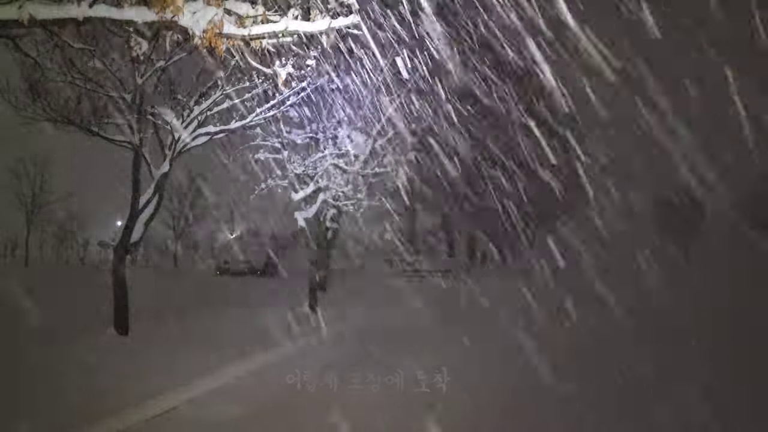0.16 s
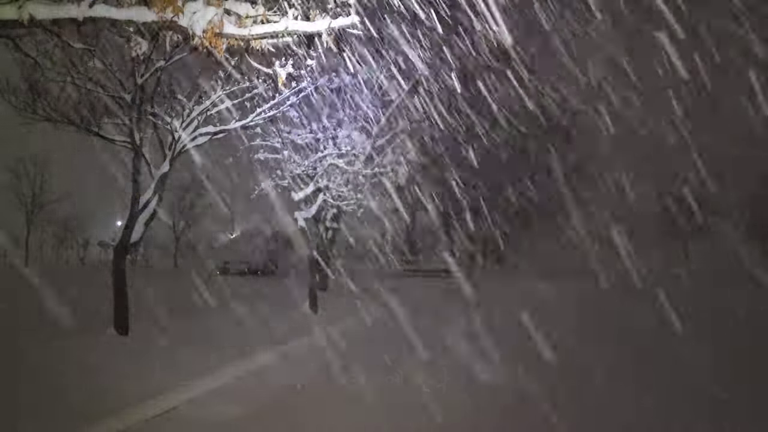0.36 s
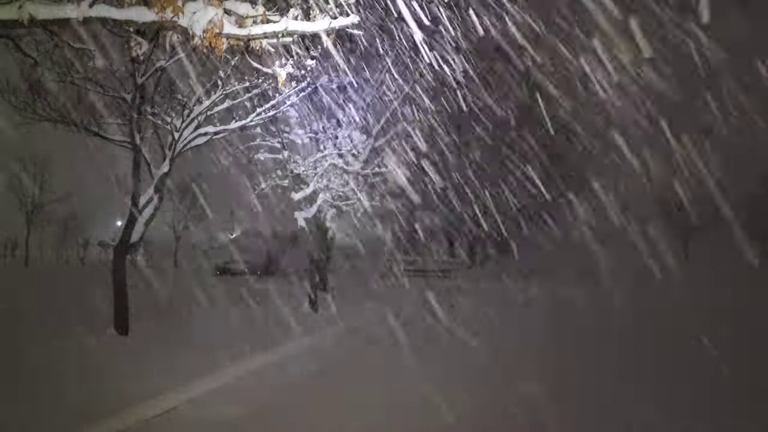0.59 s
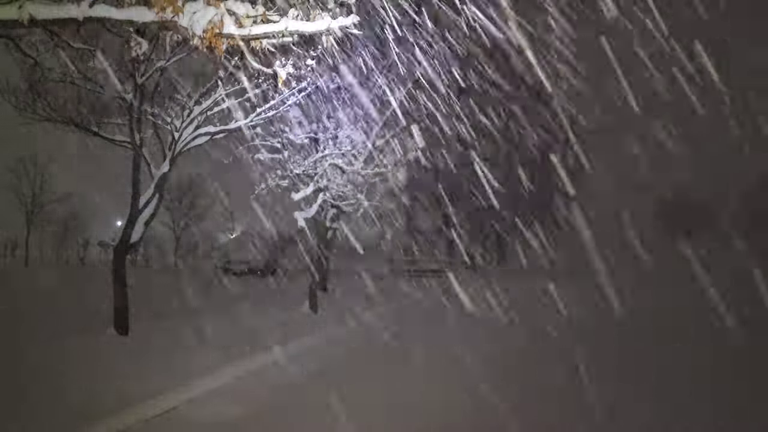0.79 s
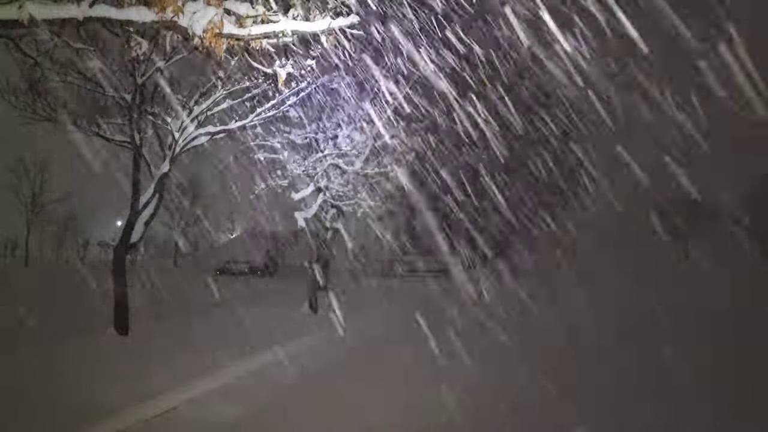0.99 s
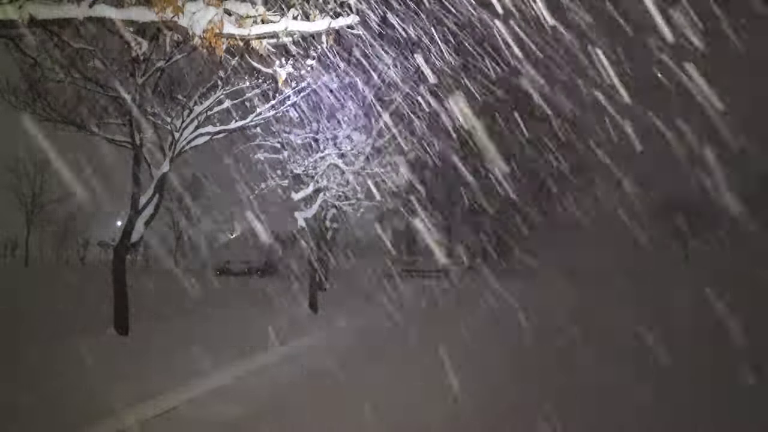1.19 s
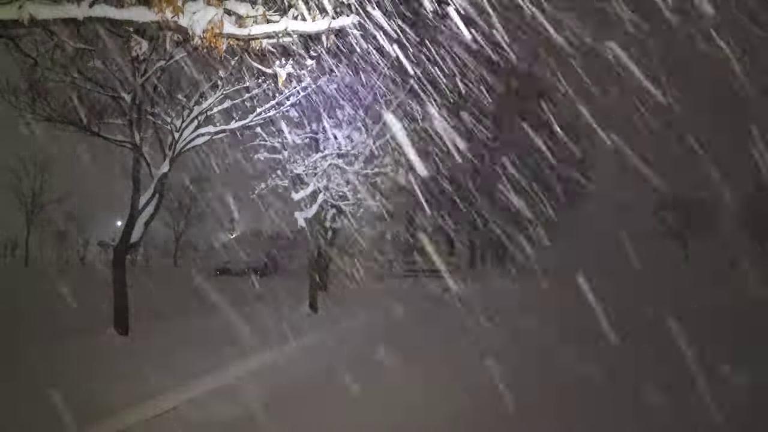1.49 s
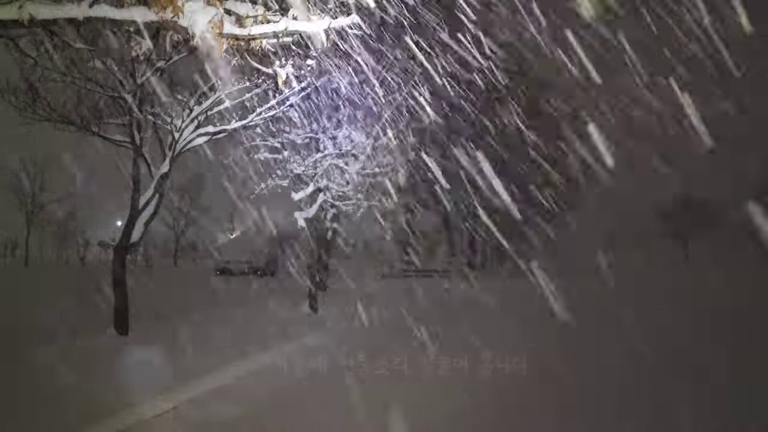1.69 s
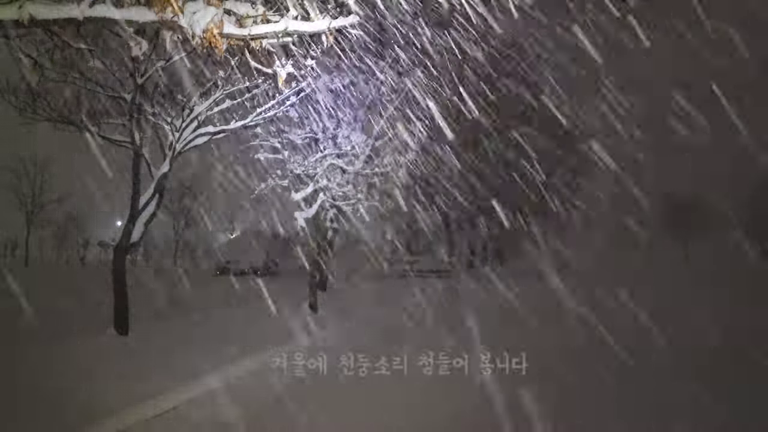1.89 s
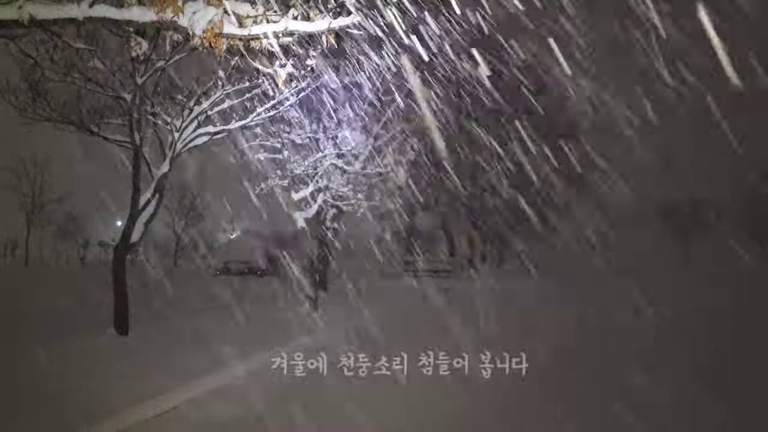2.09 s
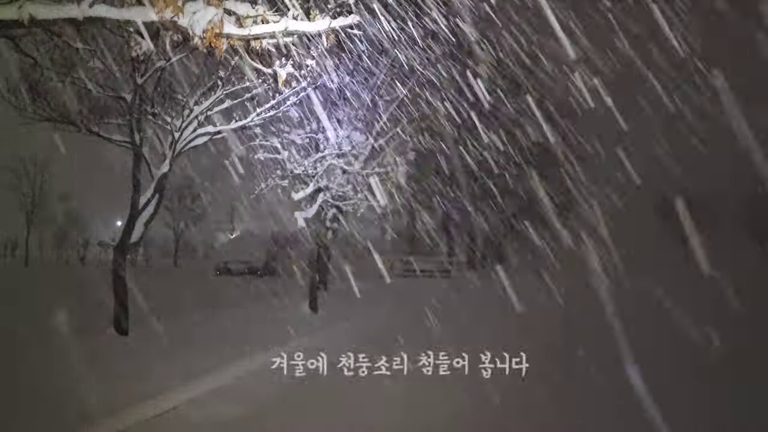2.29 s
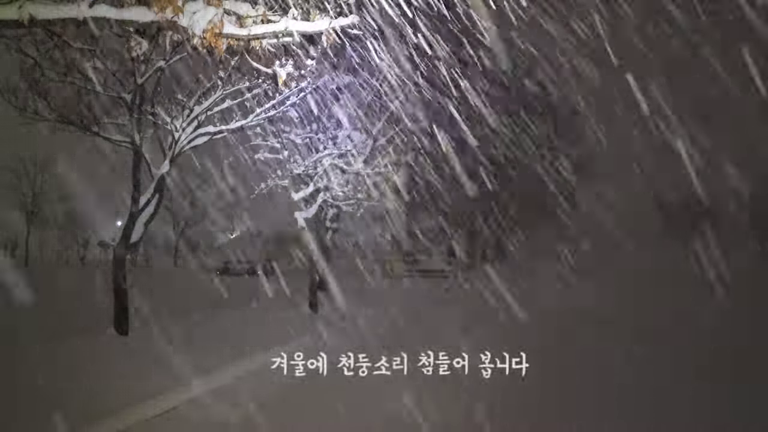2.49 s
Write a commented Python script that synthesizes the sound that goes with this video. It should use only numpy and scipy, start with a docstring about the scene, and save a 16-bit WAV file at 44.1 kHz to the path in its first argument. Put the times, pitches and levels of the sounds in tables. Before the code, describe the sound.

After a brief quiet low hum in a snowy park at night, thunder cracks, thumps in clustered peals and rolls away, with a weaker late rumble; tiny snow grains patter near the microphone, slightly left.

```python
"""Thunder breaks over a park in a night snowstorm and rolls away.
Shock waves from the crooked lightning channel arrive in peals: dense streams of clicks with echoes, coloured
as a deep roll, a hollow ring and a tearing crackle, lose varying treble to the air; single booms are fading sines.
Icy snow ticks close to the microphone as short noise bursts and ringing scratches.
Under it lie a low steady rumble and hum, faint thin tones and a hiss, all shaped from noise."""
import sys
import numpy as np
from scipy import signal
from scipy.fft import rfft, irfft
from scipy.io import wavfile
from scipy.ndimage import uniform_filter1d, map_coordinates

SR = 44100
rng = np.random.default_rng(int(sys.argv[2]) if len(sys.argv) > 2 else 0)


def to_wav(sig):
    """Store sig (one row per channel, or 1-D mono) as 16-bit WAV at the path in sys.argv[1].

    Samples outside -1..1 are clipped; the rate is SR.
    """
    pcm = np.clip(np.atleast_2d(sig), -1, 1) * 32767
    pcm = np.round(pcm).astype(np.int16)
    wavfile.write(sys.argv[1], SR, pcm.T)  # frames by channels


N = 116865
T = np.arange(N) / SR  # time in seconds


# Colour of the deep roll at first, then later on: [pitch_hz, relative level_db per Hz]
DEEP_EARLY = [(20, -18.5), (45, -25), (80, -15), (125, 1), (180, -4.5), (215, -9.5), (250, -6), (305, -18),
              (420, -16), (800, -60), (2000, -92)]
DEEP_LATE = [(20, -21), (45, -12), (85, -10.5), (125, 2), (160, -4), (210, -1), (250, 1.5), (310, -12),
             (420, -16), (800, -53), (2000, -97.5)]
LATE_FROM_S, LATE_FADE_S = 0.843, 0.3
LATE_SPREAD_DB = 3  # the later shocks are less even in size


def deep_roll():
    """Low-coloured shocks cross over, at equal power, to a later colour."""
    late = np.clip((T - LATE_FROM_S) / LATE_FADE_S, 0, 1)
    early_roll = np.sqrt(1 - late) * shocks(DEEP_EARLY)
    late_roll = np.sqrt(late) * shocks(DEEP_LATE, LATE_SPREAD_DB)
    return early_roll + late_roll


# Colour of the hollow ring before its pitch drifts: [pitch_hz, relative level_db per Hz]
HOLLOW = [(150, -42), (300, -29.5), (365, -7), (408, -1), (450, -6), (540, -16), (700, -31), (1500, -51.5),
          (3000, -88)]
# Pitch of the hollow ring along the way: [time_s, pitch_hz]
RING_PITCH = [(.2, 435.4), (.42, 425), (.53, 405), (.72, 420.3), (1.2, 405.5), (2.6, 393.3)]
RING_HZ = 408  # peak of the HOLLOW colour


def hollow_ring():
    """Shocks in a hollow resonance, read at a varying speed so that its pitch drifts."""
    speed = np.interp(T, *np.transpose(RING_PITCH)) / RING_HZ
    place = np.cumsum(speed)
    return map_coordinates(shocks(HOLLOW), [place], order=3, mode="mirror")


# Colour of the tearing crackle: [pitch_hz, relative level_db per Hz]
CRACKLE = [(100, -17), (300, -19), (480, 1), (640, -0.5), (790, 0.5), (890, -3.5), (990, -2.5), (1130, -5),
           (1420, -6), (1630, -11.5), (2100, -12), (2800, -19), (3600, -27), (5000, -40), (9000, -54.5)]


def tearing_crackle():
    """Shocks coloured towards the middle pitches tear and crackle."""
    return shocks(CRACKLE)


def thunder():
    """Three streams of shocks swell with the peals, alike in both channels, and pass through the air."""
    deep, hollow, crackle = strength()
    peals = deep * deep_roll() + hollow * hollow_ring() + crackle * tearing_crackle()
    return through_air(peals)


# Peals, levels before the air: [start_s, length_s, deep_level_db, hollow_level_db, crackle_level_db]
PEALS = [(0.189, 0.039, -34, -31, -51), (0.205, 0.032, -37, -46, -38), (0.255, 0.077, -28.5, -33, -45),
         (0.414, 0.065, -31.5, -26, -39), (0.498, 0.053, -42, -22, -34), (0.589, 0.029, -24.5, -28.5, -36),
         (0.618, 0.036, -26, -30, -30), (0.673, 0.13, -31, -31, -39.5), (0.924, 0.046, -29.5, -37.5, -42),
         (1.053, 0.029, -27.5, -33.5, -34.5), (1.092, 0.015, -29, -35.5, -42),
         (1.132, 0.013, -30, -27.5, -40.5), (1.162, 0.053, -24.5, -47, -36),
         (1.295, 0.033, -30.5, -34, -38.5), (1.384, 0.04, -26, -34.5, -37.5),
         (1.473, 0.058, -28.5, -37.5, -42), (2.057, 0.026, -28, -37.5, -41.5),
         (2.09, 0.066, -32.5, -40, -42.5), (2.165, 0.105, -34.5, -49.5, -41)]
# Long roll between the peals, levels before the air: [time_s, deep_level_db, crackle_level_db]
ROLL = [(.19, -32.5, -37.5), (.39, -33, -38), (.6, -26, -35), (.88, -32.5, -38), (1.02, -34.5, -38.5),
        (1.25, -30, -37), (1.58, -33.5, -41.5), (1.8, -38, -41), (2.02, -42, -43), (2.3, -37, -43.5),
        (2.44, -39.5, -46), (2.56, -42.5, -44), (2.65, -41, -47)]
ROLL_RING_DB = -1  # hollow ring of the long roll, relative to its crackle
ATTACK_S, RELEASE_S = 0.0069, 0.013


def strength():
    """Gains of deep roll, hollow ring and crackle: the power of the peals adds to that of the long roll."""
    s, deep_db, crackle_db = np.transpose(ROLL)
    deep = amp(np.interp(T, s, deep_db))
    crackle = amp(np.interp(T, s, crackle_db))
    onset = np.clip((T - PEALS[0][0]) / ATTACK_S, 0, 1)
    power = (np.array([deep, crackle * amp(ROLL_RING_DB), crackle]) * onset) ** 2
    for start, length, *levels_db in PEALS:
        rise = np.clip((T - start) / ATTACK_S, 0, 1)
        fall = np.exp(-np.maximum(T - start - length, 0) / RELEASE_S)
        power += (amp(levels_db)[:, None] * rise * fall) ** 2
    return np.sqrt(power)


SHOCKS_PER_S, SHOCK_SPREAD_DB = 9000, 2.4
EVEN_S = .024  # window over which swells are evened out
# echoes from the surroundings: first delay, time to fall 60 dB, summed energy against the direct shock
ECHO_S, ECHO_T60_S, ECHO_DB = .012, 0.65, -8


def shocks(points, spread_db=SHOCK_SPREAD_DB):
    """A steady stream of small shock waves and their echoes off the surroundings, in one colour."""
    t = T[:SR // 2]
    sparse = rng.standard_normal(len(t)) * (rng.random(len(t)) < .01)
    echo = sparse * (t > ECHO_S) * amp(-60 * t / ECHO_T60_S)
    echo *= amp(ECHO_DB) / np.linalg.norm(echo)
    echo[0] = 1  # the direct shock
    echoing = convolve(clicks(SHOCKS_PER_S, spread_db), echo)
    x = convolve(echoing, colour(points))[0]
    local_power = abs(uniform_filter1d(x ** 2, max(int(EVEN_S * SR), 1)))
    # dividing by the root of the local power evens the swells out
    return x / np.sqrt(local_power + 1e-9)


# Treble lost in the air: [time_s, loss_db per kHz above 1 kHz]
AIR_LOSS = [(.19, 1), (.65, 1.4), (1.05, 3.5), (1.6, 4), (2.2, 7.5), (2.55, 3.5)]


def through_air(x):
    """The air takes treble by an amount that changes with the time of arrival."""
    hz, t, z = signal.stft(x, SR, nperseg=256)
    khz_above = np.maximum(hz / 1000 - 1, 0)
    db_per_khz = np.maximum(np.interp(t, *np.transpose(AIR_LOSS)), 0)
    loss_db = np.outer(khz_above, db_per_khz)
    return signal.istft(z * amp(-loss_db), SR, nperseg=256)[1][:N]


# Single strong shocks: [start_s, level_db of the sine, length_s of one swing up and down, shudder_s decay time]
BOOMS = [(.2462, -20.5, 0.0043, .002), (.2812, -19.5, 0.0059, 0.0026), (.595, -12.5, .0062, 0.0038),
         (.622, -13, 0.0084, 0.0025), (.7835, -17.5, 0.0057, 0.0034), (1.0545, -19, 0.0049, 0.016),
         (1.197, -16, 0.0046, 0.0075), (1.3105, -16, 0.0044, .007), (1.366, -18, 0.011, 0.0035),
         (2.1172, -18, 0.006, .001), (2.2295, -19.5, 0.0065, 0.0015), (2.3515, -24.5, 0.0051, .003)]


def booms():
    """Each strong shock is a smooth pressure swing that shudders on at the same pitch as it fades."""
    out, t = np.zeros(N), T[:SR // 10]
    for s, db, length, shudder in BOOMS:
        fade = np.exp(-np.maximum(t - .75 * length, 0) / shudder)
        add(out, s, amp(db) * fade * np.sin(2 * np.pi * t / length))
    return out


# Colour of the snow grains: [pitch_hz, relative level_db per Hz]
GRAIN = [(500, -12), (2500, -5), (4000, 3.5), (5200, -3.5), (6300, 2), (7400, 1), (9000, -0.5), (10500, -8),
         (11600, -3), (15500, -11)]
# Small clumps of snow, level before the grain colour: [start_s, level_db, length_s, left_minus_right_db]
TICKS = [(0.168, -63, .004, 5), (0.243, -58.5, 0.008, 3.5), (0.272, -56.5, 0.004, .5),
         (0.371, -60.5, 0.011, 3), (0.46, -60, .004, 2.5), (0.48, -61, .008, 5),
         (0.728, -58.5, 0.0041, 3.5), (.813, -60, 0.0033, 2.5), (0.833, -61, 0.009, 1),
         (1.235, -62, 0.0043, -1), (1.289, -64, .004, 2.5), (1.349, -62, 0.0046, 4),
         (1.487, -60, 0.0084, 4), (1.627, -61, 0.0046, -8), (1.644, -54, 0.0037, 3),
         (1.724, -60, 0.0073, 2), (1.747, -58, 0.004, 6), (1.81, -58, 0.0059, -1), (1.877, -59, .004, 5),
         (2.083, -63.5, 0.016, 1), (2.332, -60, 0.011, 0), (2.546, -58.5, 0.0039, -3)]
GRAINS_PER_S, GRAIN_SPREAD_DB = 370, 2.5  # in each channel
GRAINS_DB = -72.5  # before the tilt to the left
SNOW_LEFT_DB = 1.24  # left raised and right lowered by this much


def snow():
    """Icy grains patter near the microphone as clicks; clumps crumble in noise bursts as they land."""
    left, right = [clicks(GRAINS_PER_S, GRAIN_SPREAD_DB) * amp(GRAINS_DB + side * SNOW_LEFT_DB)
                   for side in (1, -1)]
    hits = np.array([left, right])
    t = T[:SR // 10]
    for s, db, length, pan_db in TICKS:
        shape = np.sqrt(2 * t / length) * np.exp(.5 - t / length)  # peaks at 1, half a length in
        crumble = rng.standard_normal((2, len(t))) * shape
        add(hits, s, crumble * amp(db) * amp([[pan_db / 2], [-pan_db / 2]]))
    return convolve(hits, colour(GRAIN))


# Pitches over which the single ice grains are spread: [pitch_hz]
PING_PITCHES = [4500, 6800, 7400, 7600, 8600, 9300]
PINGS_PER_S, PING_SPREAD_DB = 100, 2  # in each channel
PING_S, PING_WIDTH_HZ = .0025, 1200  # decay time of the scratch, width of each resonance
PINGS_DB = -71.5  # before the tilt to the left


def pings(count=28):
    """Single ice grains scratch briefly: noise in a double resonance, each in one channel."""
    t, out = T[:SR // 20], np.zeros((2, N))
    size = amp(PING_SPREAD_DB * np.minimum(rng.exponential(1, (2, N)), 3))
    size *= rng.random((2, N)) < PINGS_PER_S / SR
    kind = rng.integers(0, count, (2, N))
    given = np.linspace(0, 1, len(PING_PITCHES))
    pitches = np.interp(np.linspace(0, 1, count), given, PING_PITCHES)
    for k, hz in enumerate(pitches):
        scratch = rng.standard_normal(len(t)) * np.sqrt(t) * np.exp(-t / PING_S)
        pole = np.exp(np.pi * (2j * hz - PING_WIDTH_HZ) / SR)
        ping = signal.lfilter([1], np.poly([pole, pole]), scratch).real
        out += convolve(size * (kind == k), unit(ping))
    return amp(PINGS_DB) * unit(out) * left_tilt()


# Colour of the low rumble: [pitch_hz, relative level_db per Hz]
RUMBLE = [(20, -25), (42, -14.5), (66, 4.5), (90, -3), (130, -7.5), (165, -7.5), (215, -4.5), (260, -22.5),
          (300, -15), (360, -25), (500, -34), (700, -35.5), (870, -41), (1400, -45.5), (2100, -45.5),
          (2700, -49), (6000, -65)]
RUMBLE_DB = -40.5
HUM_HZ, HUM_WIDTH_HZ, HUM_DB = 64.1, 4.9, -43.5


def rumble_and_hum():
    """Low distant rumble of shaped noise with a wavering hum, alike in both channels."""
    return amp(RUMBLE_DB) * noise(RUMBLE) + amp(HUM_DB) * tone(HUM_HZ, HUM_WIDTH_HZ)


# Colour of the faint hiss: [pitch_hz, relative level_db per Hz]
HISS = [(60, 14), (300, 13.5), (420, 14.5), (500, 3.5), (750, 7), (880, -4), (2300, -1), (3100, 4),
        (4000, 4), (5200, -2.5), (7500, -3), (9000, -0.5), (10500, -9.5), (11600, -12.5), (13500, -6.5),
        (15500, -5)]
HISS_DB = -64  # before the tilt to the left


def hiss():
    """Faint shaped noise, separate in each channel."""
    return amp(HISS_DB) * noise(HISS, channels=2)


# Faint tones, level before the tilt: [pitch_hz, width_hz, level_db, left-right likeness from -1 to 1]
RINGING = [(406, 17, -63, 0.96), (576, 14, -66, 0.71), (739, 11, -66.5, -0.25), (1438, 35, -67, -.7),
           (1773, 38, -64, -0.69), (2940, 52, -73, -0.14), (7400, 150, -81, -0.1)]


def ringing():
    """Thin lasting tones, each with its own likeness between the channels."""
    out = np.zeros((2, N))
    for hz, width, db, likeness in RINGING:
        left, other = tone(hz, width, channels=2)
        right = likeness * left + np.sqrt(1 - likeness ** 2) * other
        out += amp(db) * np.array([left, right])
    return out


def background():
    """Rumble and hum in the middle; hiss and thin tones lean to the left."""
    return rumble_and_hum() + (hiss() + ringing()) * left_tilt()


def left_tilt():
    """Channel gains that lean a sound to the left, as the snow does."""
    return amp([[SNOW_LEFT_DB], [-SNOW_LEFT_DB]])


def amp(db):
    """Decibels to gain."""
    return 10 ** (np.asarray(db) / 20)


def unit(x):
    """Scales to rms 1."""
    return x / np.sqrt(np.mean(x ** 2) + 1e-20)


def add(mix, s, sound):
    """Mixes a sound in at a time in seconds."""
    part = mix[..., max(round(s * SR), 0):][..., :sound.shape[-1]]
    part += sound[..., :part.shape[-1]]


def convolve(x, response):
    """Filters one or two channels with an impulse response."""
    return signal.fftconvolve(np.atleast_2d(x), np.atleast_2d(response), axes=1)[:, :N]


def colour(points, size=8192):
    """Causal (minimum-phase) impulse response of energy 1 with the given spectrum shape."""
    hz, db = np.transpose(points)
    bins_hz = abs(np.fft.fftfreq(size, 1 / SR))
    log_gain = np.log(amp(np.interp(np.log(bins_hz + 1), np.log(hz), db)))
    spectrum = np.exp(np.conj(signal.hilbert(log_gain)))
    response = np.fft.ifft(spectrum).real[:size // 2]
    return response / np.linalg.norm(response)


def clicks(per_s, spread_db):
    """Randomly timed clicks of uneven size and either sign, at rms 1."""
    size = amp(spread_db * np.minimum(rng.exponential(1, N), 4))
    sign = rng.choice([-1., 1.], N)
    return unit(size * sign * (rng.random(N) < per_s / SR))


def noise(points, channels=1):
    """Steady noise of rms 1 with the given spectrum shape."""
    hz, db = np.transpose(points)
    gain = amp(np.interp(np.log(np.fft.rfftfreq(N, 1 / SR) + 1), np.log(hz), db))
    return unit(irfft(rfft(rng.standard_normal((channels, N))) * gain, N))


def tone(hz, width_hz, channels=1):
    """Wavering tone of rms 1: noise in one narrow resonance, at half gain one width off its pitch."""
    gain = 1 / (1 + ((np.fft.rfftfreq(N, 1 / SR) - hz) / width_hz) ** 2)
    return unit(irfft(rfft(rng.standard_normal((channels, N))) * gain, N))


def scene():
    """Thunder over the snowy park, from the main source to the background."""
    return thunder() + booms() + snow() + pings() + background()


EDGE_HZ = 15750


def record(dry):
    """The recorder's band limit: a low-pass at its upper edge."""
    low_pass = signal.firwin(511, EDGE_HZ, window=("kaiser", 9), fs=SR)
    return signal.oaconvolve(dry, low_pass[None], "same")


dry = scene()
out = record(dry)
to_wav(out)
```